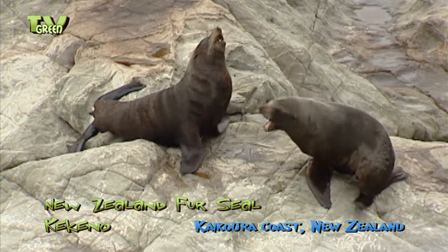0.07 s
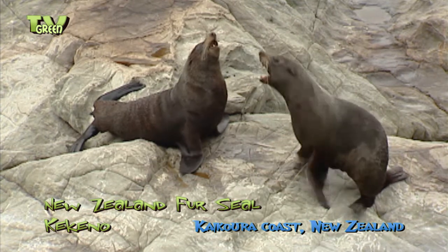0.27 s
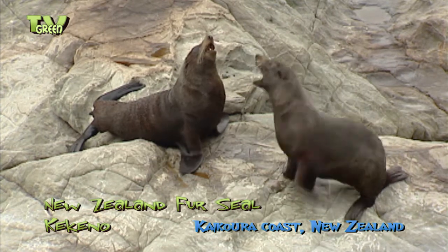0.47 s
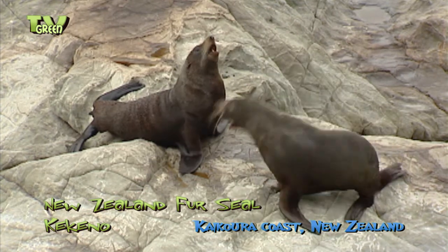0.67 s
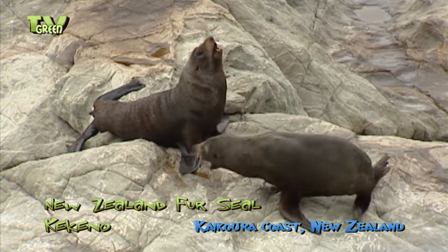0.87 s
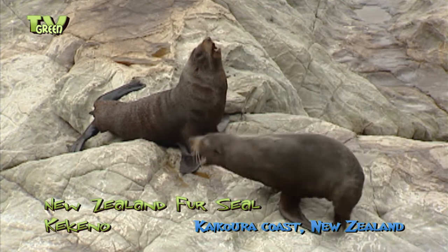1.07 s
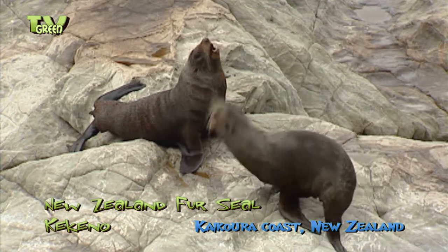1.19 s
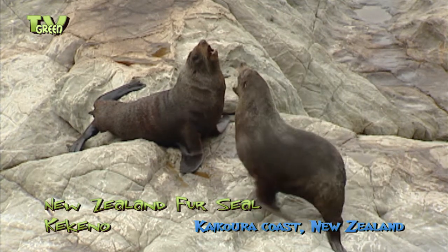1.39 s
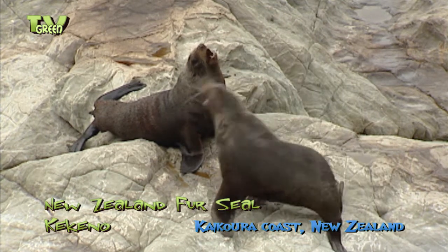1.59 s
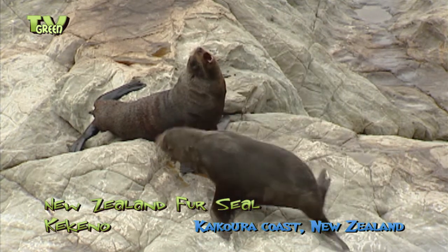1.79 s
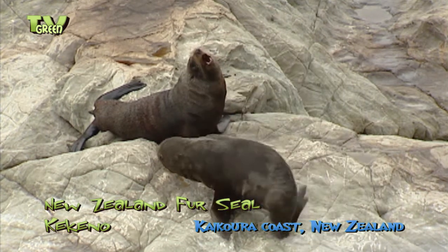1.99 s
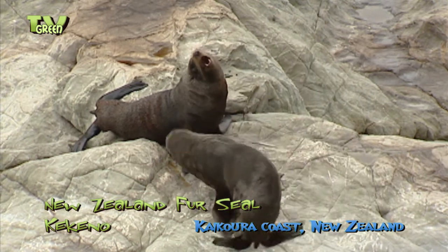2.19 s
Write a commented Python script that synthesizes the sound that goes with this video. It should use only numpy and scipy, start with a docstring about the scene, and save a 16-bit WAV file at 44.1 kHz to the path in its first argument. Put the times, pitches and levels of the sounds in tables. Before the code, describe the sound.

On coastal rocks, a fur seal lets out a brief high yelp with a wet mouth click, followed by two quieter, low, raspy whimpers and a dull flipper scuff, all over an even wash of surf.

```python
"""Two fur seals squabble on coastal rocks, over a steady wash of surf and faint wind. One yelps with two voice
tones at once, which beat and mix, and its wet mouth clicks. Two softer, lower whimpers follow, made of voice
pulses that set the throat ringing. A flipper scuffs the stone, and the rocks give each seal sound a short echo.
Left and right sound almost the same, with a faint high whine throughout."""
import sys
import numpy as np
from scipy import signal
from scipy.fft import rfft, irfft, next_fast_len
from scipy.io import wavfile
from scipy.ndimage import uniform_filter1d, map_coordinates

SR = 44100
rng = np.random.default_rng(int(sys.argv[2]) if len(sys.argv) > 2 else 0)


def bounce(signal):
    """Save signal as a 16-bit WAV file at the path given by the first command-line argument."""
    frames = np.transpose(np.atleast_2d(signal))
    limited = np.clip(frames, -1, 1)
    pcm = np.round(limited * 32767).astype(np.int16)
    wavfile.write(sys.argv[1], SR, pcm)


N = 99225
T = np.arange(N) / SR  # time of each sample [s]


def yelp(flutter_db=1.9, rasp_db=-23.5):
    """Two gliding voice tones mix, making new tones at sums and differences of their pitches."""
    # the lower voice tone (time [s], pitch [Hz], level [dB])
    low_tone = [(.24, 894.6, -37), (.246, 908.6, -24), (.26, 921.7, -20), (.281, 880.5, -25.7),
                (.297, 837.3, -21), (.317, 887, -21.3), (.329, 897, -27), (.338, 890, -41),
                (.346, 860, -22.3), (.36, 812, -28.5), (.369, 848, -25.3), (.378, 828, -38),
                (.385, 870, -25.3), (.4, 860, -32), (.409, 842, -43), (.422, 837, -38)]
    # the upper voice tone (time [s], pitch [Hz], level [dB])
    high_tone = [(.233, 1135, -36), (.244, 1290, -37), (.26, 1289, -36), (.273, 1125, -33),
                 (.287, 1270, -28.7), (.309, 1347, -34.5), (.323, 1283, -30), (.331, 1302, -40),
                 (.341, 1248, -28.3), (.36, 1179, -26), (.378, 1144, -40), (.42, 1100, -49)]
    # the overtone one octave above the lower tone (time [s], level [dB])
    octave_tone = [(.25, -45), (.295, -61), (.336, -36.5), (.362, -48)]
    # what each new tone is made of (lower pitch [multiple], upper pitch [multiple])
    mixes = [(1, 1), (0, 2), (-1, 2), (2, -1)]
    # how strongly the two tones mix (time [s], gain [dB])
    mixing = [(.265, -3), (.293, 4), (.32, -4)]
    # how the open mouth shapes the new tones (frequency [Hz], gain [dB])
    mouth = [(650, -32.5), (1650, -20), (2020, -42), (2160, -17), (2380, -26.5), (2650, -21)]
    # tone colour of the rasp (frequency [Hz], relative level [dB])
    rasp_colour = [(300, -23), (1200, 2), (2500, -1.5), (4000, -8), (6000, -30), (8300, -21.5),
                   (11000, -43), (13600, -31.5), (15500, -47)]
    low_hz, low_db = curves(low_tone)
    high_hz, high_db = curves(high_tone)
    octave_db = curves(octave_tone)[0]
    low_phase = cycle(low_hz, jitter=0.0056, rate=330)
    high_phase = cycle(high_hz, jitter=0.011, rate=300)
    low_gain = gate(low_tone) * amp(low_db + 0.31 * wobble(350))
    high_gain = gate(high_tone) * amp(high_db + flutter_db * wobble(260))
    octave_gain = gate(octave_tone) * amp(octave_db + 1.5 * wobble(198))
    mix_gain = np.sqrt(low_gain * high_gain) * amp(curves(mixing)[0])
    tones = low_gain * np.sin(low_phase) + high_gain * np.sin(high_phase)
    tones += octave_gain * np.sin(2 * low_phase)
    for m, n in mixes:
        mouth_gain = amp(along(mouth, m * low_hz + n * high_hz))
        tones += mix_gain * mouth_gain * np.sin(m * low_phase + n * high_phase)
    beating = 1 + np.cos(high_phase - low_phase)  # peaks when the two tones are in step
    rasp = amp(rasp_db) * low_gain * beating * noise(rasp_colour)
    return np.sqrt(2) * tones + rasp


def whimpers():
    """A long whimper, then a shorter, raspier one."""
    # the voice in each whimper (time [s], pitch [Hz], level [dB])
    long_call = [(1.262, 160, -48), (1.275, 162.4, -38), (1.287, 179.7, -46.5), (1.305, 194.6, -33),
                 (1.316, 190, -39), (1.327, 209.4, -30), (1.335, 196.7, -39), (1.346, 187.3, -28.5),
                 (1.362, 189.3, -49), (1.372, 207.7, -32.5), (1.395, 212.5, -37.5), (1.416, 250, -42),
                 (1.438, 255, -30.5), (1.453, 251, -41), (1.471, 217, -36.5), (1.482, 208, -50)]
    short_call = [(1.692, 187, -44), (1.7, 192, -21.5), (1.706, 184.4, -36), (1.712, 186.3, -31),
                  (1.718, 185.8, -48), (1.726, 190, -48), (1.731, 196.2, -31.5), (1.745, 207.5, -32.5),
                  (1.758, 229.4, -36), (1.767, 250.3, -30.5), (1.776, 259, -28.3), (1.807, 267.4, -37),
                  (1.822, 264, -49)]
    return whimper(long_call, rasp_db=-18) + whimper(short_call, rasp_db=-15)


def whimper(call, rasp_db, ring_hz=807, ring_half_width_hz=85, ease_s=0.0039):
    """Low voice pulses ring the throat; each overtone swells as it glides past the ringing pitch."""
    # how the throat shapes the voice (frequency [Hz], relative gain [dB])
    throat = [(150, -11), (400, -20), (620, -5), (770, 16), (850, 11), (980, -12), (1250, -9), (1700, -24),
              (6000, -58)]
    # the mouth's opening scales the throat's frequencies, ring_hz too (time [s], scale [factor])
    opening = [(1.39, 1.018), (1.403, .84), (1.435, 1), (1.475, .84), (1.69, 0.995), (1.755, 1.02)]
    pitch_hz, level_db = curves(call)
    phase = cycle(pitch_hz, jitter=0.0079, rate=220)
    harmonics = np.arange(1, 21)[:, None]  # whole multiples of the pitch
    throat_hz = harmonics * pitch_hz / curves(opening)[0]
    gains = amp(along(throat, throat_hz))
    lags = np.arctan((throat_hz - ring_hz) / ring_half_width_hz)  # make each pulse ring on
    pulses = (gains * np.cos(harmonics * phase - lags)).sum(0)
    voice = np.sqrt(2) * pulses / np.linalg.norm(gains, axis=0)
    rasp = amp(rasp_db) * (1 + np.cos(phase)) * noise(throat)
    loudness = uniform_filter1d(gate(call) * amp(level_db), size=int(ease_s * SR) + 1)
    return loudness * (voice + rasp) + gate(call) * nasal_tone(phase)


def nasal_tone(phase, harmonic=9, peak_s=1.437, half_length_s=0.028, peak_db=-49.5):
    """One overtone swells and fades as the long whimper turns nasal at its highest pitch."""
    swell = np.exp(-((T - peak_s) / half_length_s) ** 2)
    return np.sqrt(2) * amp(peak_db) * swell * np.sin(harmonic * phase)


def flipper_scuff():
    """A flipper rubs the rock, making one dull puff of noise."""
    # the rub (start [s], level [dB], fade time [s])
    scuffs = [(2.207, -38.5, 0.037)]
    # its tone colour (frequency [Hz], relative level [dB])
    colour = [(150, -35.5), (500, 6.5), (1000, 2.5), (3000, -50)]
    return puffs(scuffs, colour, attack_s=0.0021)


def mouth_clicks():
    """The wet mouth clicks just before the yelp and once during it."""
    # the clicks (start [s], level [dB], fade time [s])
    clicks = [(.223, -40, 0.0076), (.309, -47.5, .008)]
    # their tone colour (frequency [Hz], relative level [dB])
    colour = [(800, -3.5), (3800, 17.5), (6000, -7), (9000, -8), (15000, -18.5)]
    return puffs(clicks, colour, attack_s=0.0011)


def rock_echo(sound, echo_db=-16):
    """The rocks scatter the sound back as a short, blurred echo."""
    # how long the echo lasts (frequency [Hz], time to fade by 60 dB [s])
    fade_times = [(200, 0.13), (1000, 0.42), (8000, 0.27)]
    hz, age_s, bands = signal.stft(rng.standard_normal(SR // 3), SR, nperseg=256)
    fade = amp(-60 * age_s / along(fade_times, hz)[:, None])
    tail = signal.istft(bands * fade, SR, nperseg=256)[1]
    return amp(echo_db) * signal.fftconvolve(sound, tail / np.linalg.norm(tail))[:N]


def surf(level_db=-39.5, patchy_db=0.3, hiss_hz=2400):
    """Water makes an even wash of noise with faint shifting patches and one clear swell of hiss."""
    # tone colour of the water (frequency [Hz], relative level [dB])
    colour = [(25, -46.5), (70, -40), (105, -15.5), (135, -9.5), (200, -5.5), (270, -1), (400, -0.5),
              (650, -1), (1000, -3.5), (1500, -9.5), (2200, -11), (3700, -17), (5000, -23.5), (6500, -32.5),
              (8000, -33.5), (10000, -42.5), (13000, -48), (15400, -48.5)]
    # how far the hiss is turned up or down (time [s], gain [dB])
    hiss_swell = [(.1, 0.5), (.5, -1.5), (.66, 2.5), (.73, 1.3), (1.35, -0.74), (1.95, 0.5)]
    bands = signal.stft(noise(colour), nperseg=512)[2]
    patches = uniform_filter1d(rng.standard_normal(bands.shape), size=8, axis=0)  # blur in frequency
    patches = uniform_filter1d(patches, size=24, axis=1)  # blur in time
    bands *= amp(patchy_db * unit(patches))
    wash = unit(signal.istft(bands, nperseg=512)[1][:N])
    hiss = filtered(wash, lambda hz: hz ** 2 / (hz ** 2 + hiss_hz ** 2))
    body = wash - hiss
    return amp(level_db) * (body + amp(curves(hiss_swell)[0]) * hiss)


def wind(gust_db=7):
    """Wind on the microphone makes a faint, uneven rumble."""
    # the wind dying down (time [s], level [dB])
    strength = [(0.5, -69), (1.4, -83.5)]
    # tone colour of the rumble (frequency [Hz], relative level [dB])
    colour = [(20, -10), (80, 0.5), (300, -38)]
    return amp(curves(strength)[0] + gust_db * wobble(14)) * noise(colour)


def amp(db):
    """Turn decibels into a number to multiply by."""
    return 10 ** (np.asarray(db) / 20)


def unit(x):
    """Scale a signal to an average (rms) size of 1."""
    return x / np.sqrt(np.mean(x ** 2) + 1e-20)


def along(points, hz):
    """Read a (frequency, value) table at hz, on a log frequency scale."""
    point_hz, values = np.transpose(points)
    return np.interp(np.log(hz + 1), np.log(point_hz + 1), values)


def curves(rows):
    """Join a table's points over time, giving one curve for each column after the first."""
    times, *columns = np.transpose(rows)
    return [np.interp(T, times, column) for column in columns]


def gate(rows, edge_s=0.0042):
    """Switch a voice on from the first row's time to the last, with a quick fade at each end."""
    inside_s = np.minimum(T - rows[0][0], rows[-1][0] - T)
    return np.clip(1 + inside_s / edge_s, 0, 1)


def wobble(rate):
    """A smooth curve through `rate` random values a second."""
    return map_coordinates(rng.standard_normal(8192), [T * rate], mode="wrap")


def cycle(hz, jitter, rate):
    """The phase (running angle) of a tone whose pitch trembles by about the fraction `jitter`."""
    return 2 * np.pi * np.cumsum(hz * (1 + jitter * wobble(rate))) / SR


def filtered(x, response):
    """Multiply each frequency in x by response(hz)."""
    size = next_fast_len(N + SR // 2)
    hz = np.fft.rfftfreq(size, 1 / SR)
    return irfft(rfft(x, size) * response(hz), size)[..., :N]


def noise(colour):
    """Noise with the given tone colour and an average size of 1."""
    return unit(filtered(rng.standard_normal(N), lambda hz: amp(along(colour, hz))))


def puffs(rows, colour, attack_s):
    """Brief bursts of noise that rise fast and die away."""
    loudness = np.zeros(N)
    for start_s, db, fade_s in rows:
        age_s = np.maximum(T - start_s, 0)
        loudness += amp(db) * (1 - np.exp(-age_s / attack_s)) * np.exp(-age_s / fade_s)
    return loudness * noise(colour)


def scene():
    """Seals, their echo, surf and wind, all straight ahead."""
    seals = yelp() + whimpers() + flipper_scuff() + mouth_clicks()
    mono = seals + rock_echo(seals) + surf() + wind()
    return np.array([mono, mono])


def record(dry, whine_hz=15625, whine_db=-75, top_hz=15800):
    """The left microphone cuts more bass; a faint high whine is added, and the recorder keeps nothing above
    top_hz."""
    # how much weaker the left side is than the right (frequency [Hz], gain [dB])
    left_loss = [(50, -5), (130, -2), (290, 0)]
    # how far the bass cut puts the left wave ahead of the right (frequency [Hz], phase [radians])
    left_lead = [(60, 2.5), (130, 1.37), (300, 0.48), (2000, 0)]

    def microphones(hz):
        """Give each side half of the left-right contrast, in opposite directions."""
        left_over_right = amp(along(left_loss, hz)) * np.exp(1j * along(left_lead, hz))
        return left_over_right ** np.array([[0.5], [-0.5]])

    whine = np.sqrt(2) * amp(whine_db) * np.sin(2 * np.pi * whine_hz * T)
    return filtered(filtered(dry, microphones) + whine, lambda hz: hz < top_hz)


dry = scene()
out = record(dry)
bounce(out)
```